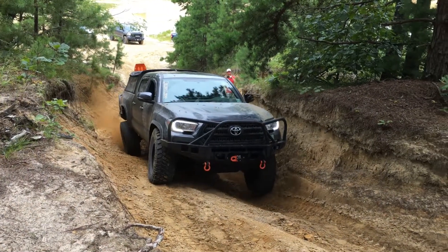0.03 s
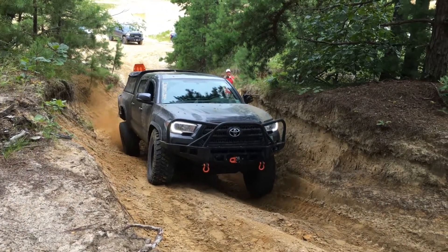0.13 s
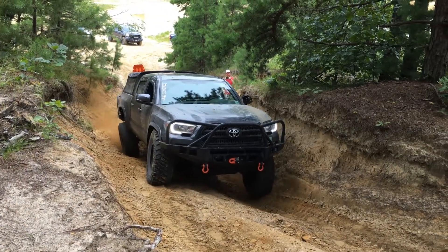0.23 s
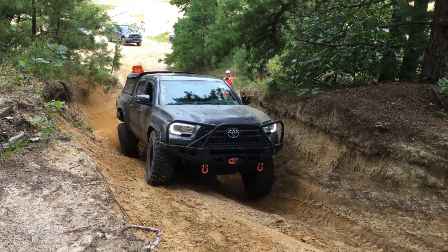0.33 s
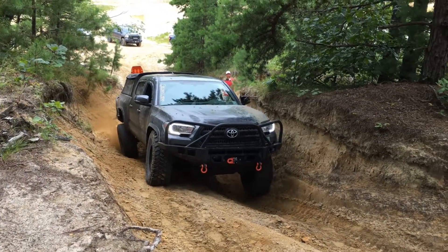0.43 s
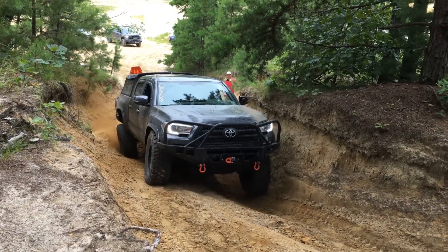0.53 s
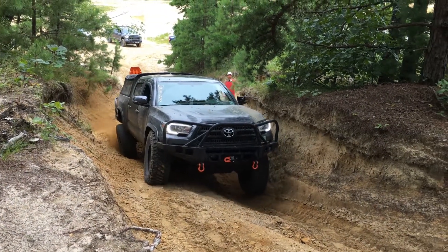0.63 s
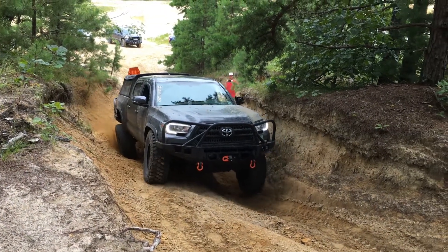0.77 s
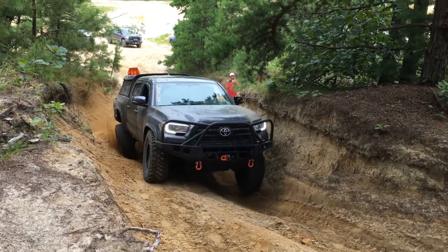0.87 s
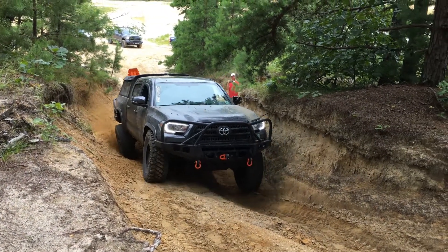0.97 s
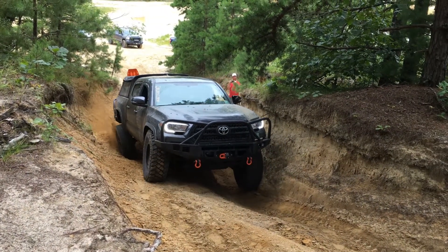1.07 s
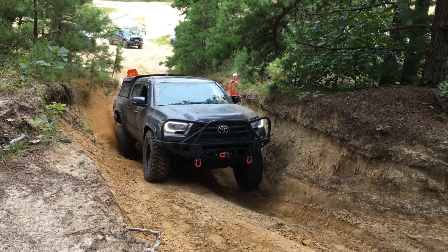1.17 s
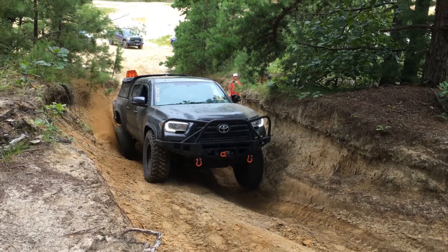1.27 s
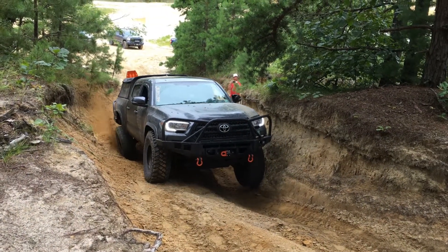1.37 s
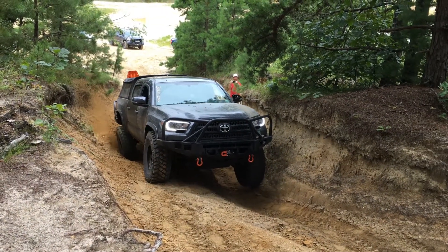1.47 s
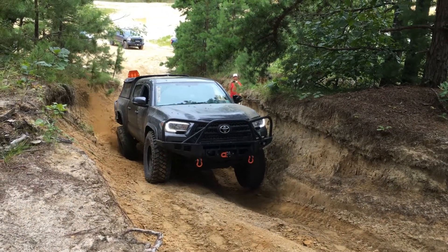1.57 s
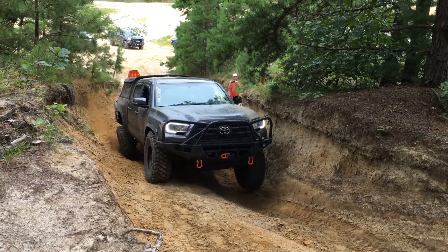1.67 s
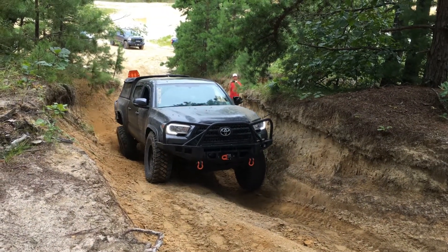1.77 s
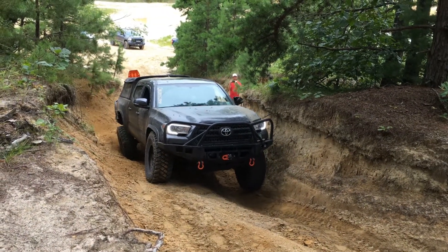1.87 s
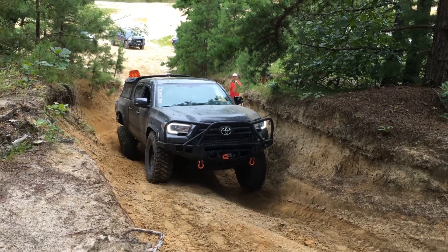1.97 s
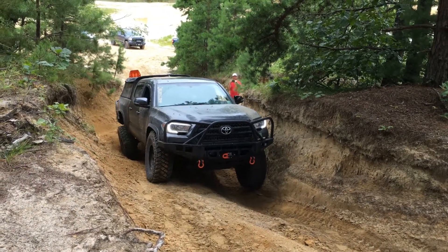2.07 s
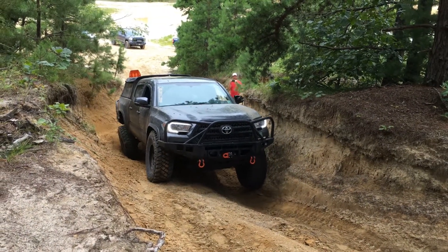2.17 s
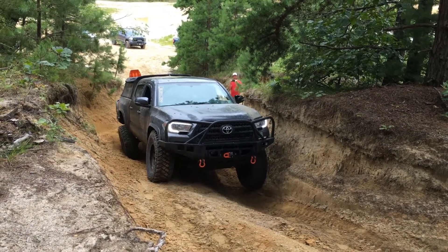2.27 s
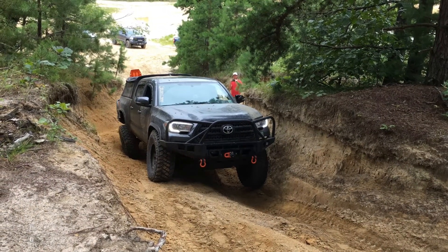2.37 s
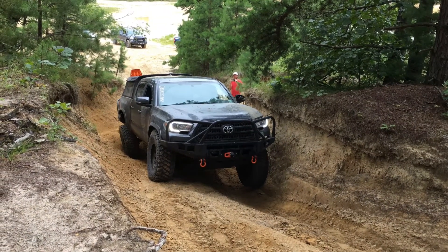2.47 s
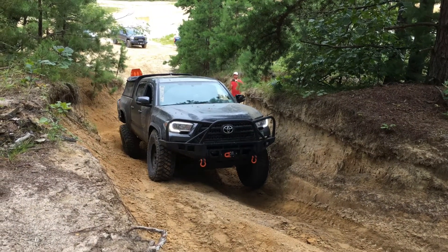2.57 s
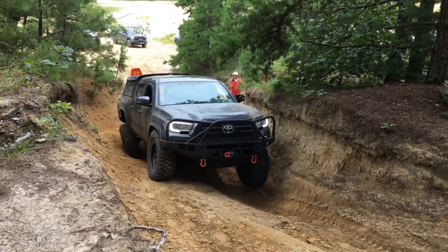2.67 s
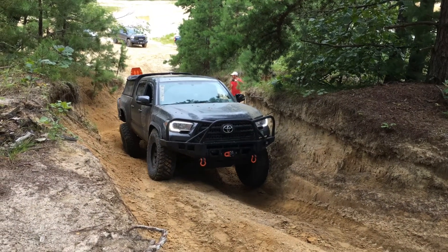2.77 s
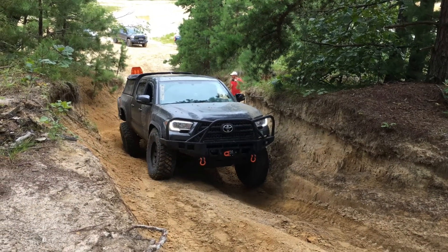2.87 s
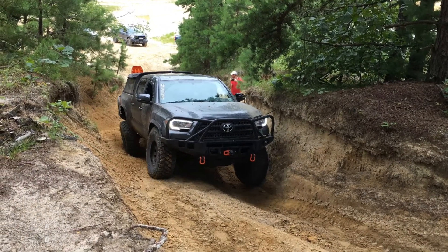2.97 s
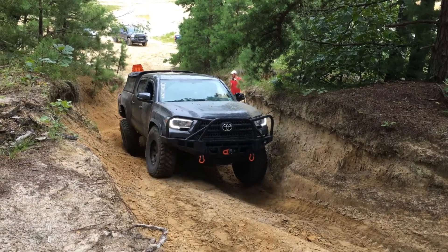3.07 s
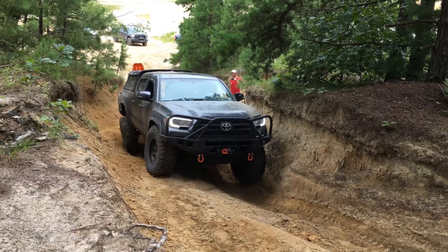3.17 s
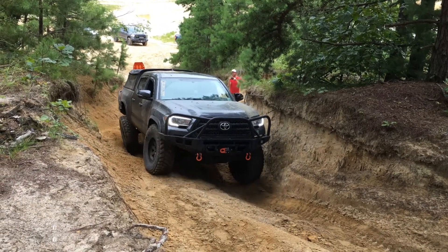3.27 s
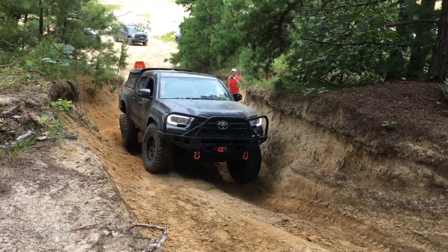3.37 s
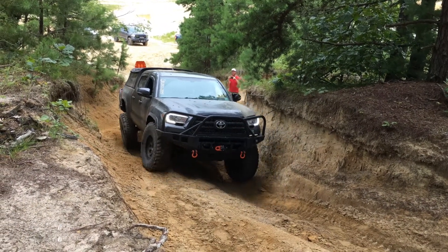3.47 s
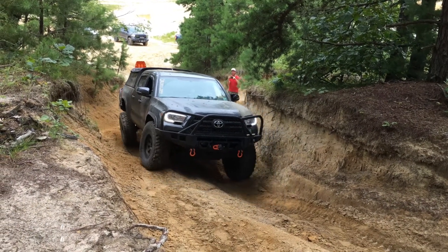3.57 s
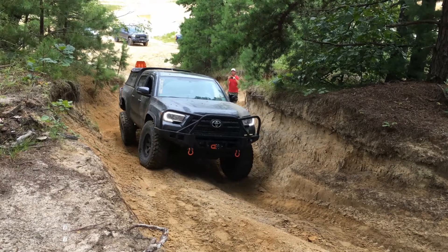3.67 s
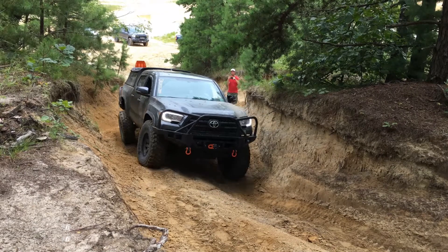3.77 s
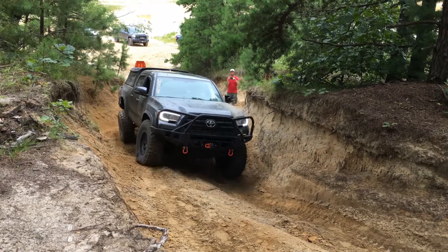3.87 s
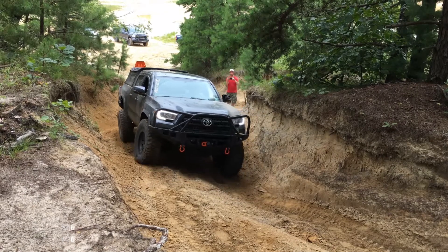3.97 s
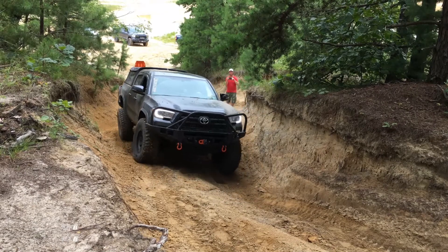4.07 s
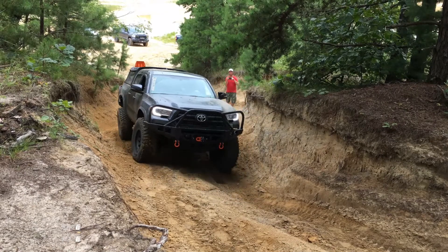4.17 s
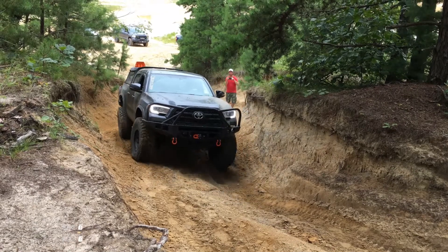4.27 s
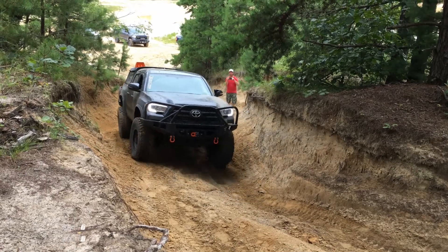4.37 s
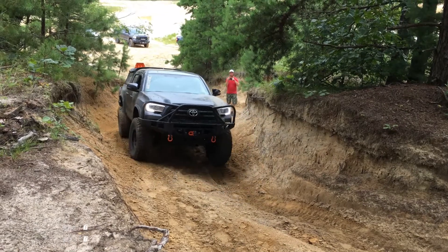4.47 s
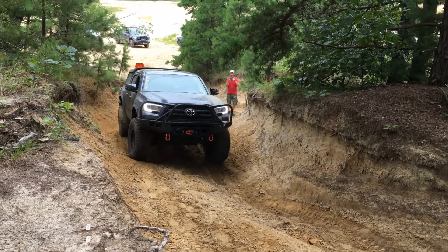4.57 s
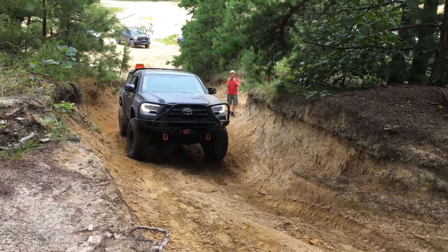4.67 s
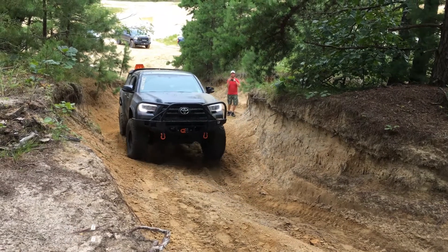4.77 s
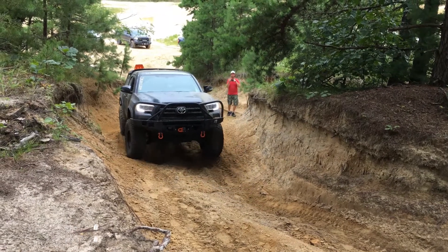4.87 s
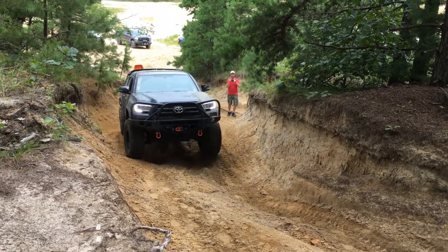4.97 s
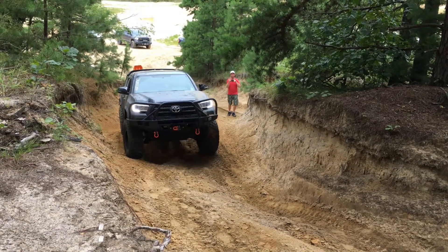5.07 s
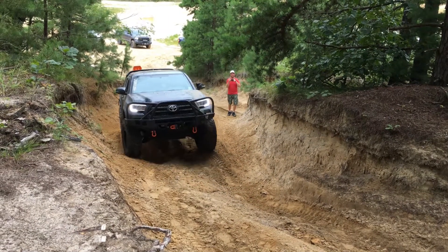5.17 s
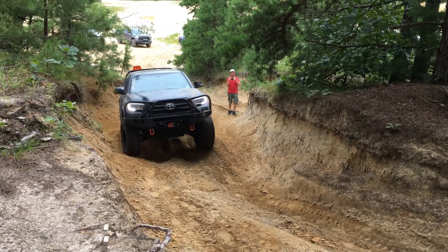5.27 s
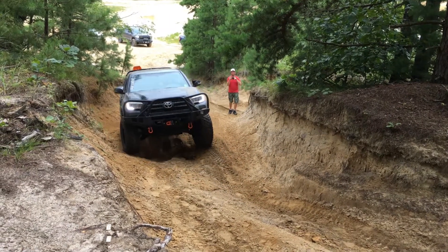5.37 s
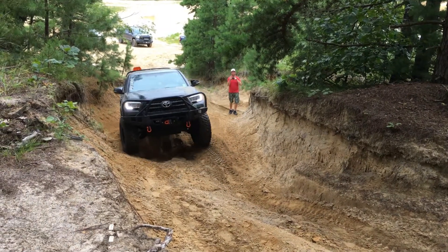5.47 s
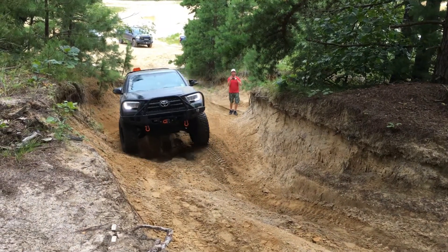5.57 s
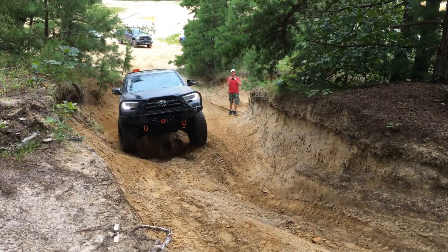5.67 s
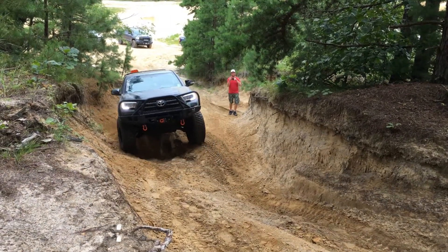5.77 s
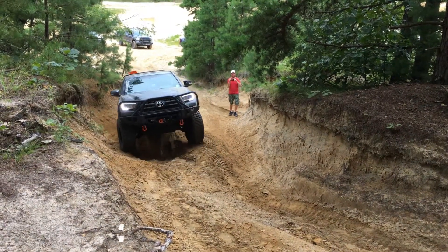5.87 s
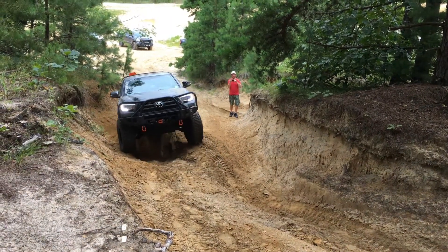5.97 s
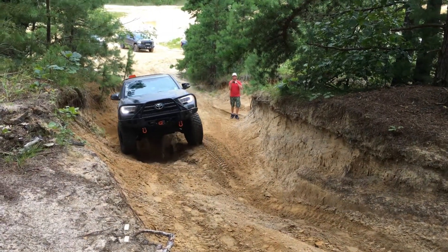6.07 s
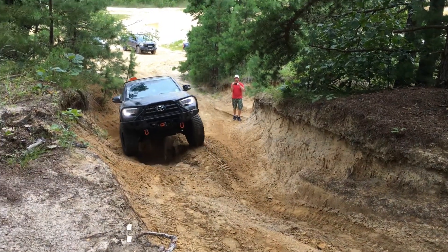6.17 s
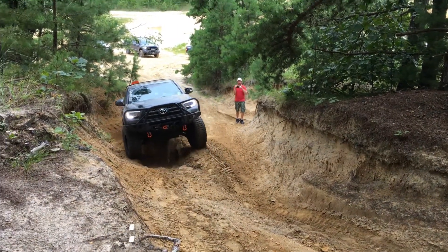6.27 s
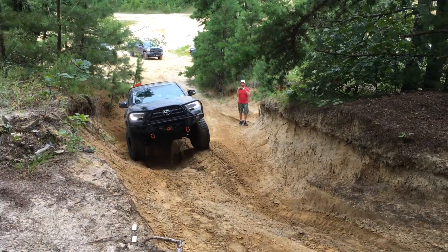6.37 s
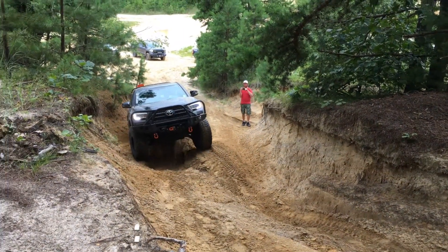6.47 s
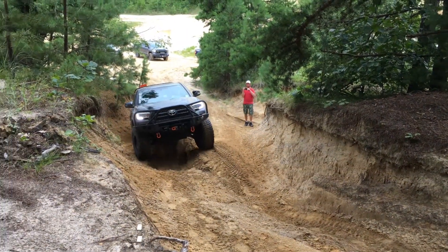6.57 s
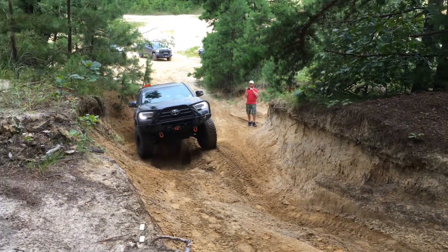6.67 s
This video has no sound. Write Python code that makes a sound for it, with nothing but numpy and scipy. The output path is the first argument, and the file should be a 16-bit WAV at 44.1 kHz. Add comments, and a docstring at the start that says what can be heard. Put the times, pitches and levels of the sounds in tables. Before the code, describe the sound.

A raspy, rising engine roar with broad fan rush and sand hiss opens at its loudest, then falls abruptly as the driver lifts off. Low hums and exhaust rumble sink into a faint, steady idle. Over it come dry pebble clicks, a cluster of hollow plate knocks, a brief airy spit and muffled suspension thuds. Open air, no obvious echo, the truck heard from down the hill by a single microphone.

```python
"""The engine of a pickup truck roars on a sandy climb as the wheels spin, then drops to a low idle as it rolls back.
Uneven firings and gas puffs excite intake resonances; exhaust, panels, fan and thrown sand are coloured noise.
Hums, brief fuzzy tones and a broad moving hump of noise come and go; the idle is a stack of sine harmonics.
Pebbles and spits are filtered noise bursts, thuds a damped swing, knocks the decaying modes of a plate.
All of it reaches one microphone."""
import sys
import numpy as np
from scipy import signal
from scipy.fft import rfft, irfft
from scipy.io import wavfile
from scipy.ndimage import uniform_filter1d

SR = 44100
rng = np.random.default_rng(int(sys.argv[2]) if len(sys.argv) > 2 else 0)


def persist_wave(psi):
    """Save psi, clipped to +-1, as 16-bit WAV."""
    counts = np.round(np.clip(psi, -1, 1) * 32767).astype(np.int16)
    wavfile.write(sys.argv[1], SR, np.atleast_2d(counts).T)


N = 295911
TIME = np.arange(N) / SR


def gain_of(db):
    """Level definition: turns decibels into an amplitude factor."""
    return 10 ** (np.asarray(db) / 20)


def evened(x):
    """Power normalisation: scales a signal to rms 1."""
    return x / np.sqrt(np.mean(x ** 2) + 1e-20)


def add(mix, s, sound):
    """Superposition: adds a sound to the mix from time s, in seconds."""
    part = mix[round(s * SR):][:len(sound)]
    part += sound[:len(part)]


def columns(rows):
    """Linear interpolation: returns the start time and each column of a curve, sample by sample."""
    s, *values = np.transpose(rows)
    t = np.arange(s[0], s[-1], 1 / SR)
    return s[0], [np.interp(t, s, v) for v in values]


def drift(size, count):
    """Low-passed randomness: a wander of rms 1, averaged twice over size points."""
    wander = uniform_filter1d(rng.standard_normal(count), size)
    return evened(uniform_filter1d(wander, size))


def resonate(x, hz, width):
    """Heterodyne resonance: shifts hz down to zero, smooths with a one-pole filter and shifts back."""
    turn = np.exp(2j * np.pi * np.cumsum(hz * np.ones(len(x))) / SR)
    r = np.exp(-np.pi * width / SR)
    smooth = signal.lfilter([1 - r], [1, -r], x / turn + 1e-18)
    return 2 * (turn * smooth).real


def coloured(x, spectrum):
    """Spectral shaping: weights x by a curve on a log-frequency axis, 90 dB down outside its ends."""
    hz = np.fft.rfftfreq(len(x), 1 / SR)
    f, db = np.transpose(spectrum)
    shape = gain_of(np.interp(np.log(hz + 1), np.log(f + 1), db, left=-90, right=-90))
    return evened(irfft(rfft(x) * shape, len(x)))


def turbulence(patchy_db, flicker_db):
    """Modulated noise: level patches drift in time and pitch, and one flicker is shared by all pitches."""
    frames = N // 128 + 5
    a, b, patches = rng.standard_normal((frames, 257, 3)).T
    patches = uniform_filter1d(patches, size=2, axis=0)  # across pitch
    patches = evened(uniform_filter1d(patches, size=24, axis=1))  # across time
    flicker = drift(size=5, count=frames)
    z = (a + 1j * b) * gain_of(patchy_db * patches + flicker_db * flicker)
    return evened(signal.istft(z, nperseg=512, noverlap=384)[1][:N])


def harmonics(rows, orders, waver_db):
    """Additive synthesis: sines at multiples of a pitch curve, the higher ones wavering more."""
    s, (hz, db) = columns(rows)
    turns = np.cumsum(hz) / SR
    wave = np.zeros(len(hz))
    for k, level in orders:
        level_db = level + k * waver_db * drift(size=3000, count=len(hz))
        wave += gain_of(level_db) * np.sin(2 * np.pi * (round(k) * turns + rng.random()))
    return s, np.sqrt(2) * gain_of(db) * wave * signal.windows.tukey(len(hz), min(1, 8000 / len(hz)))


# Full throttle, two surges and the lift-off. Each row: time in seconds, mean firing rate in Hz,
# roar level in dB before a constant cut, brightness in dB per octave.
THROTTLE_CURVE = [(0, 247.9, -32.5, 2), (.18, 260, -16.5, 1), (.31, 281.9, -20.5, -0.5),
                  (.42, 307.3, -14.5, -5), (.51, 322.7, -15.5, 0), (.55, 329.1, -18.5, 7),
                  (.64, 326, -24.5, 12), (.68, 310.7, -30.5, 1), (.8, 291, -36.5, -10),
                  (.88, 279, -43.5, -9), (1.3, 234.6, -44, 4)]
# Intake resonances. Each row: frequency in Hz, relative width in Hz before a common widening,
# level in dB at neutral brightness.
INTAKE_MODES = [(342, 35, -2.5), (416, 91, -16), (563.5, 40, -3.5), (652, 22, -7.5), (709, 31, -0.5),
                (779, 39, -3.5), (847, 40, -5.5), (938, 82, -8.5), (1044, 76, -7), (1200, 110, -7)]
ROAR_CUT_DB, WIDENING = 7.0, 1.65
FIRING_TONE_DB, TONE_WAVER_DB = -24.5, 1.5
LIFT_S, TONE_FADE_DB_PER_S = 0.53, 172  # the tone dies when the throttle shuts


def roar():
    """Forced resonance: uneven firings and gas puffs ring the intake, and the firing rate adds a wavering tone."""
    s, (hz, roar_db, bright_db) = columns(THROTTLE_CURVE)
    count = len(hz)
    turns = np.cumsum(hz * (1 + .012 * drift(size=600, count=count))) / SR
    fired = np.diff(np.floor(turns), prepend=0)  # one impulse per firing
    firings = gain_of(3.4 * rng.standard_normal(count)) * fired
    puffs = (0.28 + np.exp(-(turns % 1) / 0.31)) * rng.standard_normal(count)
    drive = 0.48 * evened(firings) + 0.88 * evened(puffs)

    rung = np.zeros(count)
    for k, (f, width, db) in enumerate(INTAKE_MODES):
        mode = resonate(drive, f, WIDENING * width)
        mode = evened(resonate(mode, f, WIDENING * width))
        rung += (-1) ** k * gain_of(db + bright_db * np.log2(f / 700)) * mode  # signs alternate

    shut_s = np.maximum(TIME[:count] - LIFT_S, 0)
    waver = TONE_WAVER_DB * drift(size=1500, count=count)
    tone_db = FIRING_TONE_DB + waver - TONE_FADE_DB_PER_S * shut_s
    tone = np.sqrt(2) * gain_of(tone_db) * np.sin(2 * np.pi * turns)
    fade_out = np.minimum(1, np.arange(count)[::-1] / 4000)
    return s, (gain_of(roar_db - ROAR_CUT_DB) * rung + tone) * fade_out


# Exhaust rumble spectrum. Each row: frequency in Hz, relative density in dB per Hz.
RUMBLE_SPECTRUM = [(20, -31), (34, 4), (81, 3), (113, 4.5), (140, -2.5), (166, -5), (200, -11), (260, -52),
                   (440, -120)]


def exhaust(rumble_db):
    """Broadband flow noise: flickering turbulence shaped to the low exhaust rumble."""
    return gain_of(rumble_db) * coloured(turbulence(patchy_db=0.0, flicker_db=0.3), RUMBLE_SPECTRUM)


# Panel boom spectrum. Each row: frequency in Hz, relative density in dB per Hz.
BOOM_SPECTRUM = [(82, -41), (140, -5.5), (167, -4), (194, -4.5), (291, 1.5), (366, -8), (431, -18.5),
                 (520, -18), (680, -31), (1140, -120)]
IDLE_RUMBLE_DB, BOOM_IDLE_DB = -48.5, -50.5
BOOM_FOLLOWS_HISS, BOOM_FOLLOWS_RUMBLE = 0.85, 0.27  # dB gained per dB of hiss and of rumble


def panels(effort_db, rumble_db):
    """Forced vibration: uneven firing shakes the panels in lumps of noise."""
    rumble_rise_db = rumble_db - IDLE_RUMBLE_DB
    boom_db = BOOM_IDLE_DB + BOOM_FOLLOWS_HISS * effort_db + BOOM_FOLLOWS_RUMBLE * rumble_rise_db
    lumps = rng.standard_normal(N) * gain_of(2.7 * drift(size=350, count=N))
    return gain_of(boom_db) * coloured(lumps, BOOM_SPECTRUM)


# Fan rush spectrum. Each row: frequency in Hz, relative density in dB per Hz.
FAN_SPECTRUM = [(250, -37), (430, -17.5), (500, -9), (610, 0.5), (810, -2), (900, -0.5), (1320, -0.5),
                (1600, 0.5), (2070, -1.5), (2400, -4.5), (2700, -6.5), (3000, -9.5), (3790, -15),
                (4420, -16), (5000, -25.5)]
BRIGHT_IDLE_DB, BRIGHT_FOLLOWS = 0.5, -0.1  # the rush dulls as the hiss grows


def fan(fan_db, effort_db, grit):
    """Aerodynamic noise: patchy turbulence with a little grit, its treble and bass rebalanced by effort."""
    rush = coloured(turbulence(patchy_db=2.0, flicker_db=0.39) + 0.15 * evened(grit), FAN_SPECTRUM)
    dull = signal.lfilter(*signal.butter(2, 1800, fs=SR), rush)
    bright_db = BRIGHT_IDLE_DB + BRIGHT_FOLLOWS * effort_db
    return gain_of(fan_db) * (gain_of(-bright_db) * dull + gain_of(bright_db) * (rush - dull))


# Sand and valve-gear hiss spectrum. Each row: frequency in Hz, relative density in dB per Hz.
HISS_SPECTRUM = [(2240, -5), (3800, -12.5), (4840, -7.5), (5370, -1), (6080, 0.5), (8020, -5), (9450, -5),
                 (10500, -11.5), (12800, -11), (15500, -17.5)]


def sand(hiss_db, grit):
    """Shot noise: separate grains over turbulence make the hiss of thrown sand and valve gear."""
    spray = turbulence(patchy_db=1.5, flicker_db=0.7) + 0.38 * evened(grit)
    return gain_of(hiss_db) * coloured(spray, HISS_SPECTRUM)


# The engine running down. Each row: time in seconds, sand and valve-gear hiss level in dB,
# exhaust rumble level in dB, fan rush level in dB.
RUNDOWN_LEVELS = [(0.0, -35.5, -39, -23), (0.15, -34, -36, -22), (0.52, -37.5, -37, -26),
                  (0.88, -39, -35, -27.5), (1.34, -44.5, -39, -34), (1.48, -46.5, -38, -35.5),
                  (1.64, -51.5, -35.5, -40.5), (1.86, -50, -35, -41), (1.97, -54, -37, -42.5),
                  (2.2, -55, -40.5, -44.5), (2.7, -59.5, -45, -48), (3.62, -61, -43, -48.5),
                  (4.13, -59, -41, -47), (4.65, -60, -45.5, -49), (4.9, -61.5, -47.5, -48.5),
                  (5.98, -61.5, -48.5, -48.5), (6.26, -62.5, -46, -49), (6.71, -64, -46.5, -51.5)]
IDLE_HISS_DB = -61


def truck():
    """Superposed noise sources: exhaust, panels, fan and sand follow the engine as it runs down."""
    s, *levels = np.transpose(RUNDOWN_LEVELS)
    hiss_db, rumble_db, fan_db = (np.interp(TIME, s, v) for v in levels)
    effort_db = hiss_db - IDLE_HISS_DB
    grains = rng.random(N) < 1500 / SR  # on average 1500 a second
    grit = gain_of(2.5 * np.minimum(rng.exponential(1, N), 6)) * grains * rng.choice([-1, 1], N)
    return (exhaust(rumble_db) + panels(effort_db, rumble_db)
            + fan(fan_db, effort_db, grit) + sand(hiss_db, grit))


# Low hums as the truck rolls. Each row: start in seconds, length in seconds, first frequency in Hz,
# last frequency in Hz, level in dB before waver and fades.
HUM_EVENTS = [(0, 0.29, 171.5, 168.8, -32.5), (.33, 0.23, 169.4, 170.6, -35.5),
              (0.949, 0.5, 62.2, 58.6, -39), (1.357, .16, 62.5, 60.7, -31),
              (1.498, 0.18, 60.4, 60.6, -28.5), (0.598, 0.83, 114.9, 105.9, -39),
              (2.799, 0.51, 61.5, 60.8, -47), (2.951, 0.42, 91.3, 89.8, -49), (3.449, 0.43, 90, 103, -45.5),
              (3.75, 0.52, 147, 156.4, -51), (4.9, 0.73, 73.6, 84, -53)]


def hum(s, length, from_hz, to_hz, db):
    """Amplitude and frequency modulation: a low sine swells, creeps in pitch and fades."""
    return harmonics([(s, from_hz, db), (s + length, to_hz, db)], [(1, 0)], waver_db=2.0)


# Brief fuzzy tones in the roar and rush, rising or sinking. Each row: start in seconds,
# length in seconds, first frequency in Hz, last frequency in Hz, level in dB before fades.
FUZZY_TONE_EVENTS = [(0, 0.15, 1690, 1720, -34), (0.098, 0.18, 700.5, 716.4, -23.5),
                     (.17, 0.19, 590, 571.4, -26.5), (.36, 0.2, 850, 883, -26),
                     (0.403, 0.13, 580, 590, -26.5), (0.471, .19, 715, 773, -26),
                     (.34, 0.16, 411, 417, -31.5), (0.359, 0.14, 1757, 1647, -34.5),
                     (.6, .25, 750, 687, -33.5), (.64, 0.181, 1584, 1485, -36),
                     (.71, 0.27, 1920, 1770, -37), (.83, .13, 219, 201, -29.5),
                     (1.076, 0.11, 1790, 1653, -36), (1.219, 0.11, 310.6, 277, -31.5)]


def fuzzy_tone(s, length, from_hz, to_hz, db):
    """Frequency modulation: random pitch jitter makes a gliding sine narrow but fuzzy."""
    hz = np.linspace(from_hz, to_hz, round(length * SR))
    jittered_hz = hz * (1 + 0.0067 * drift(size=300, count=len(hz)))
    wave = np.sin(2 * np.pi * np.cumsum(jittered_hz) / SR)
    return s, np.sqrt(2) * gain_of(db) * wave * signal.windows.tukey(len(hz), .6)


# A broad hump in the rush, moving in pitch and lower at the end.
# Each row: time in seconds, frequency in Hz, level in dB.
HUMP_CURVE = [(.55, 1950, -62), (.75, 1876, -35.5), (1.3, 1880, -43), (1.6, 1820, -66), (3.2, 2160, -57.5),
              (4.6, 2120, -57.5), (4.9, 1620, -58), (6.72, 1610, -60.5)]


def rush_hump():
    """Time-varying filtering: noise passes twice through a moving resonance."""
    s, (hz, db) = columns(HUMP_CURVE)
    rung = resonate(rng.standard_normal(len(hz)), hz, 220)
    rung = resonate(rung, hz, 240)
    return s, gain_of(db) * evened(rung) * signal.windows.tukey(len(hz), .03)


# Suspension thuds. Each row: start in seconds, swing level in dB before onset and decay,
# frequency in Hz, 60 dB decay time in seconds.
THUD_EVENTS = [(0.767, -11, 235, 0.076), (2.46, -33, 67, 0.18), (3.605, -49, 102, 0.1),
               (3.691, -36, 97.3, 0.11), (4.657, -47, 204, 0.12), (5.842, -33.5, 127, 0.12),
               (6.041, -32.5, 88, 0.22), (6.54, -35, 61.4, 0.16)]


def thud(s, db, hz, t60):
    """Damped oscillation: a low swing decays exponentially with a rattle on top."""
    t = np.arange(8000) / SR
    rattle = evened(resonate(rng.standard_normal(len(t)), 520, 600))
    swing = np.sin(2 * np.pi * hz * t)
    onset = np.minimum(1, t / 0.0044)
    return s, gain_of(db - 60 * t / t60) * (swing + 0.18 * rattle) * onset


# Idle harmonics. Each row: multiple of the idle frequency, mean level in dB relative to the idle level.
IDLE_HARMONICS = [(1, -3), (2, -5), (3, -7), (4, -9)]
IDLE_FROM_S, IDLE_HZ, IDLE_DB = 1.9, 42.54, -50


def idle():
    """Harmonic series: a steady idle sounds whole multiples of one low frequency."""
    rows = [(s, IDLE_HZ, IDLE_DB) for s in (IDLE_FROM_S, N / SR)]
    return harmonics(rows, IDLE_HARMONICS, waver_db=0.78)


# Short bursts of filtered noise: pebbles, and one spit at 4.107 s. Each row: start in seconds,
# peak level in dB, lowest frequency in Hz, highest frequency in Hz, 60 dB decay time in seconds.
BURST_EVENTS = [(2.1, -46, 9000, 14000, .04), (2.37, -52, 9000, 13000, .04), (2.531, -47, 3030, 9100, .05),
                (2.863, -54, 11500, 15500, .04), (3.601, -45, 1503, 3000, 0.045),
                (3.744, -44, 3000, 8000, .1), (4.107, -38, 5800, 9400, .06), (4.61, -52, 2000, 6000, .05),
                (5.342, -44, 1200, 2300, .07), (6.47, -52, 4985, 14000, .08)]


def short_burst(s, db, low_hz, high_hz, t60):
    """Impulse excitation: a snap and decaying noise pass through a band of their own."""
    t = np.arange(6000) / SR
    burst = rng.standard_normal(len(t)) * gain_of(-60 * t / t60)
    burst[0] = 3.4  # the snap
    band = signal.butter(3, [low_hz, high_hz], "band", fs=SR, output="sos")
    burst = signal.sosfilt(band, burst)
    return s, gain_of(db) * burst / abs(burst).max()


# Stones knocking the skid plate. Each row: start in seconds, peak level in dB,
# brightness in dB per octave.
KNOCK_EVENTS = [(2.46, -34, -1.5), (3.0846, -30, 2.5), (3.0885, -37, 6), (3.377, -34.5, 5), (3.384, -36, 2),
                (3.44, -34, -5), (3.532, -41, -6), (3.748, -38, 3), (6.036, -32, -0.5), (6.0458, -32, -1.5),
                (6.068, -40, -1)]
# Modes of the skid plate. Each row: frequency in Hz before detuning, relative level in dB
# at neutral brightness, 60 dB decay time in seconds.
PLATE_MODES = [(350, 3, .08), (627, -1, 0.059), (967, -6, 0.09), (1310, 0.5, 0.039), (1700, -8, 0.058),
               (2250, 1, 0.032), (2470, -3, 0.043), (3180, -6, 0.026), (4000, -10, 0.023),
               (5500, -15, .015), (7140, -18, .015)]


def knock(s, db, bright_db):
    """Modal synthesis: a blow rings the plate's modes, each randomly detuned."""
    t = np.arange(6000) / SR
    ring = np.zeros(len(t))
    for (hz, level, t60), detune in zip(PLATE_MODES, rng.uniform(0.93, 1.03, len(PLATE_MODES))):
        mode_db = level + bright_db * np.log2(hz / 1500) - 60 * t / t60
        ring += gain_of(mode_db) * np.sin(2 * np.pi * hz * detune * t)
    ring *= np.minimum(1, t / 0.00029)  # contact lasts a moment, which softens the top
    return s, gain_of(db) * ring / abs(ring).max()


# Spits of air or sand in the treble. Each row: start in seconds, length in seconds,
# level in dB before fades, lowest frequency in Hz, highest frequency in Hz.
SPIT_EVENTS = [(4.045, .025, -62, 10500, 15600), (4.066, .02, -60, 13800, 15600),
               (4.05, .035, -54, 5500, 7600), (4.106, .014, -57, 9500, 15600),
               (4.118, .03, -65, 14000, 15600)]


def spit(s, length, db, low_hz, high_hz):
    """Band-limited noise: a short puff is noise passed through a band of its own."""
    noise = rng.standard_normal(round(length * SR))
    band = signal.butter(4, [low_hz, high_hz], "band", fs=SR, output="sos")
    puff = signal.sosfilt(band, noise)
    return s, gain_of(db) * evened(puff) * signal.windows.tukey(len(noise), .3)


def scene():
    """Linear superposition: all sources add, alike in both channels."""
    mix = truck()
    for source in (roar, rush_hump, idle):
        add(mix, *source())
    for source, table in ((hum, HUM_EVENTS), (fuzzy_tone, FUZZY_TONE_EVENTS), (thud, THUD_EVENTS),
                          (short_burst, BURST_EVENTS), (knock, KNOCK_EVENTS), (spit, SPIT_EVENTS)):
        for row in table:
            add(mix, *source(*row))
    return np.array([mix, mix])


EDGE_HZ = 15700  # upper band limit


def record(dry):
    """Band limitation: the microphone drops the deepest bass, then a steep filter removes the top."""
    thin = signal.sosfilt(signal.butter(3, 36, "high", fs=SR, output="sos"), dry)
    low_pass = signal.firwin(1023, EDGE_HZ, window=("kaiser", 9), fs=SR)
    return signal.oaconvolve(thin, low_pass[None], "same")


dry = scene()
out = record(dry)
persist_wave(out)
```